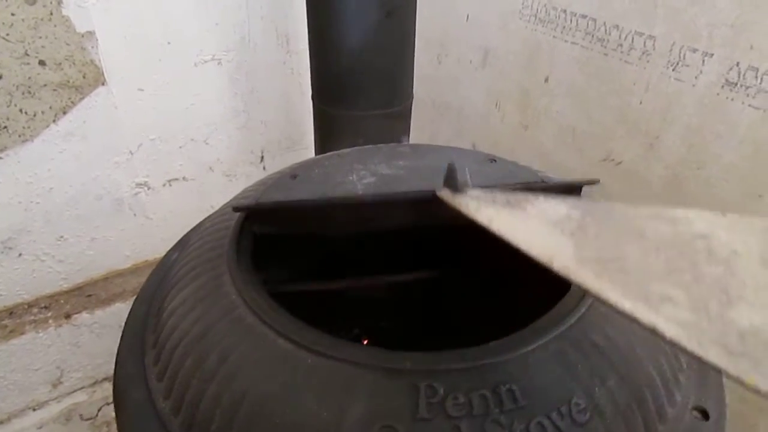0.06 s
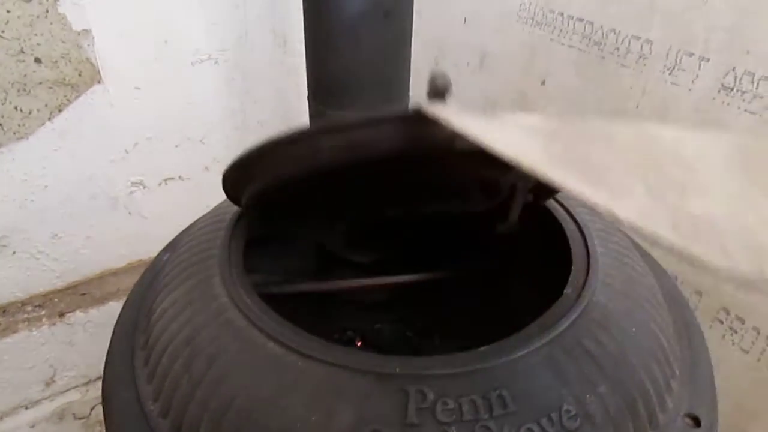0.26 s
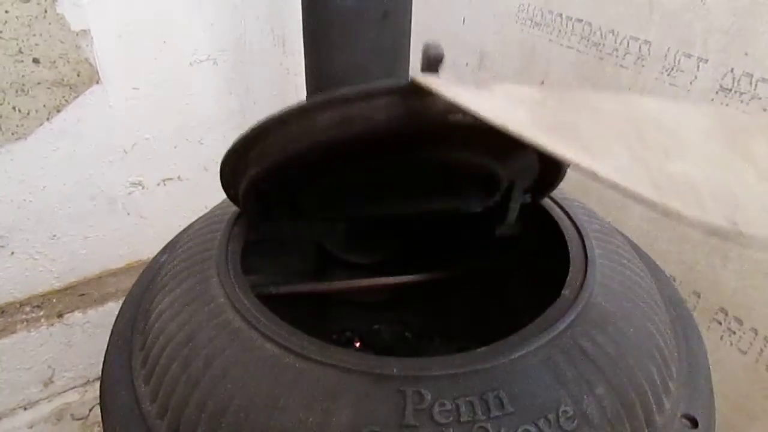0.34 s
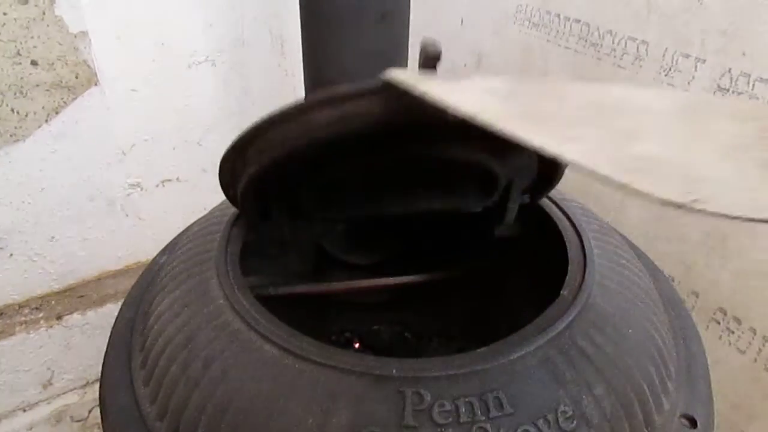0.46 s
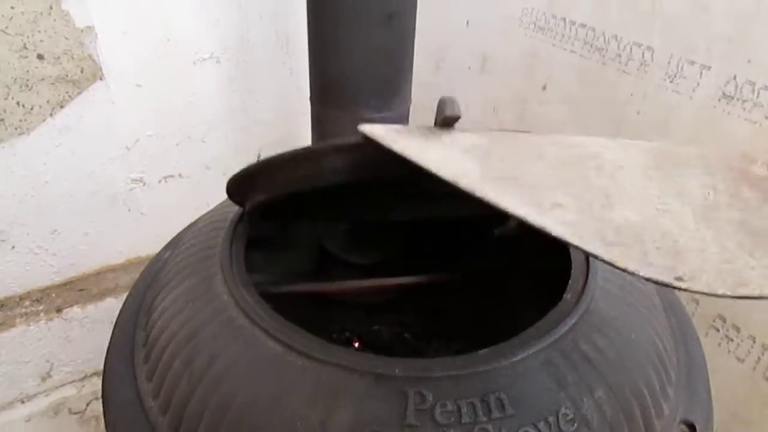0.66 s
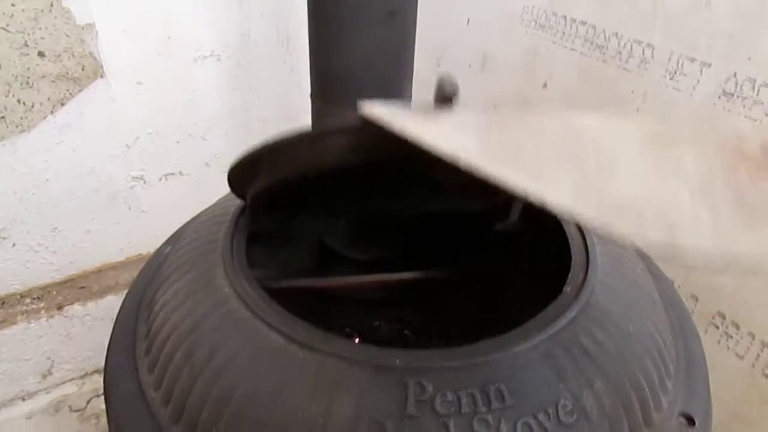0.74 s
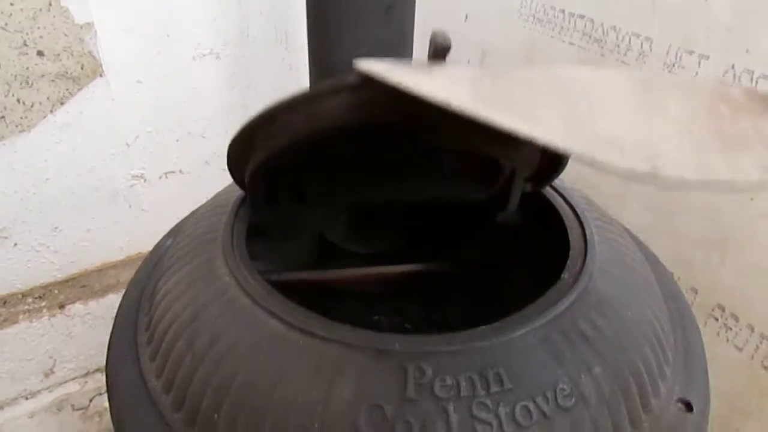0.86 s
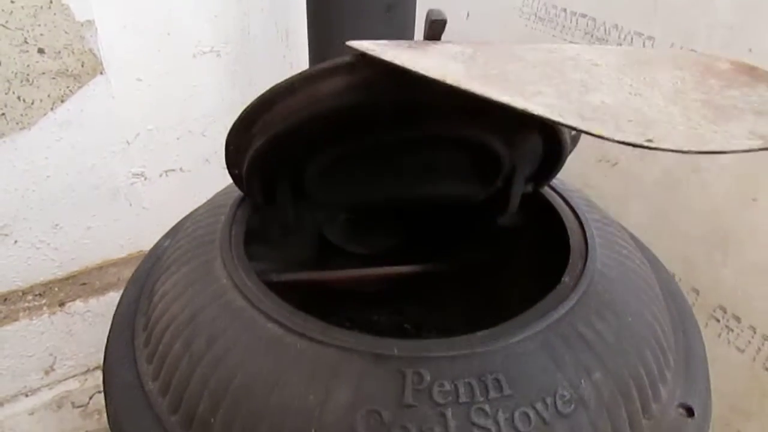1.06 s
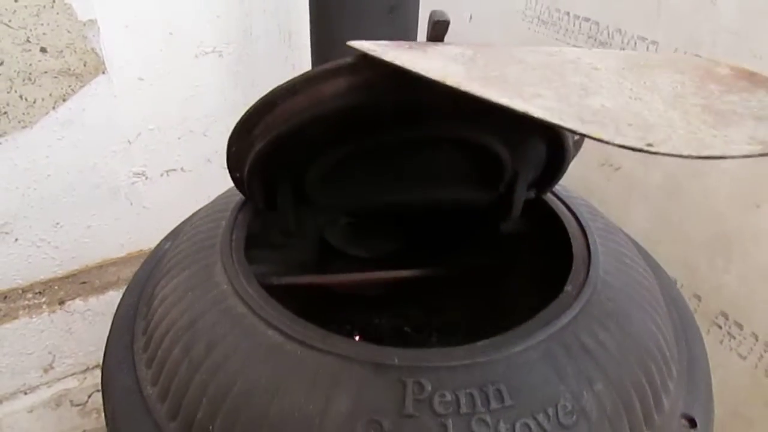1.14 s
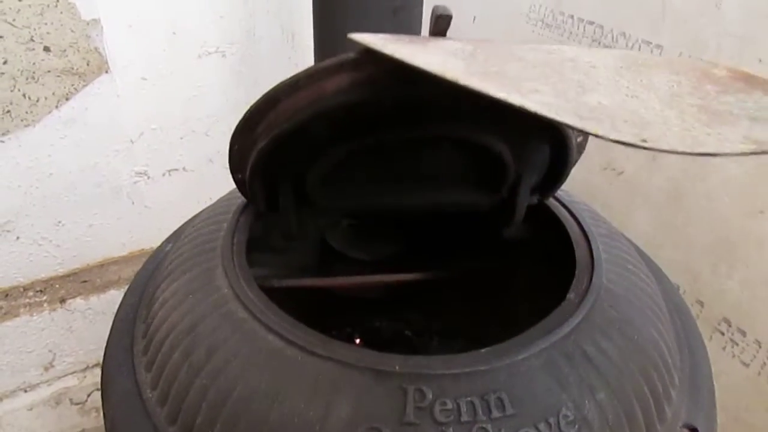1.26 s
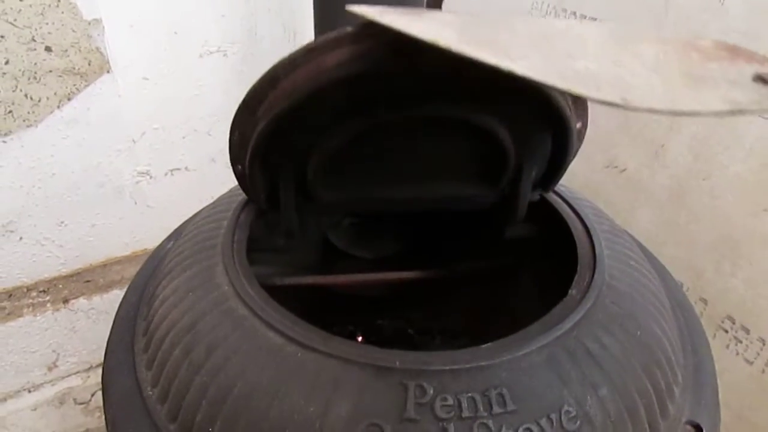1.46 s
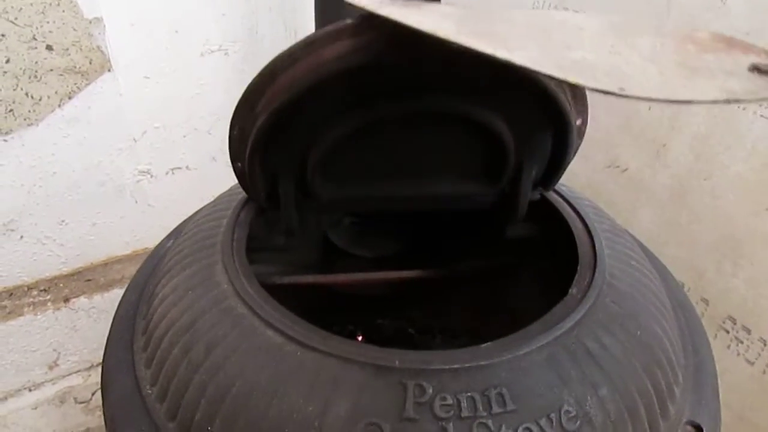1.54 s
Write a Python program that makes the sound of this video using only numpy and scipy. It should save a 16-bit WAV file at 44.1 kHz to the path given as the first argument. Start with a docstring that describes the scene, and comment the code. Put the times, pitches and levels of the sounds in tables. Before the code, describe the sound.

Close up in a quiet room, a metal blade strikes an iron stove lid, scrapes with a groaning ring and snaps free. A dull hinge thud, a faint tap and a soft bump follow over a faint hollow draught.

```python
"""Prying up a stove lid

In a small, quiet room a steel shovel blade clanks against the cast-iron lid of a stove, exciting its modes.
Stick-slip friction drives a ringing scrape, which ends with a bright snap as the edge comes free.
The lid thuds on its hinge, a little grit slides off, and a light knock and a soft bump follow.
Beneath it all, the draught sounds a low resonance in the hollow belly of the stove."""
import sys
import numpy as np
from scipy import signal
from scipy.fft import rfft, irfft
from scipy.io import wavfile
from scipy.ndimage import uniform_filter1d

SR = 44100
rng = np.random.default_rng(int(sys.argv[2]) if len(sys.argv) > 2 else 0)


def waveform_to_disk(signal):
    """Save audio, clipped to [-1, 1], as 16-bit WAV at the path in sys.argv[1]."""
    frames = np.transpose(np.atleast_2d(signal))
    scaled = np.clip(frames, -1, 1) * 32767
    samples = np.round(scaled).astype(np.int16)
    wavfile.write(sys.argv[1], SR, samples)


N = 70560
TIME_S = np.arange(N) / SR


def undb(db):
    """Amplitude ratio: a factor of ten per 20 dB."""
    return 10 ** (np.asarray(db) / 20)


def curve(rows):
    """Linear interpolation in time through (time_s, value) rows."""
    return np.interp(TIME_S, *np.array(rows).T)


def colour(x, points):
    """Minimum-phase filter through (frequency_hz, gain_db) points."""
    hz, db = np.array(points).T
    f = np.maximum(np.fft.rfftfreq(2 * N, 1 / SR), 1)
    cepstrum = irfft(np.log(undb(np.interp(np.log(f), np.log(hz), db))))
    cepstrum[1:N] *= 2  # folding the cepstrum makes the filter causal
    cepstrum[N + 1:] = 0
    return irfft(rfft(x, 2 * N) * np.exp(rfft(cepstrum)))[..., :N]


def noise(points):
    """Filtered Gaussian noise at unit RMS."""
    x = colour(rng.standard_normal(N), points)
    return x / x.std()


def metal(points, spacing_hz=75.16):
    """Dense modes of a plate: many unevenly spaced partials, together at unit RMS."""
    count = N // 100
    bins = (np.arange(count) + rng.random(count)) * spacing_hz * N / SR
    amplitudes = rng.standard_normal(count) + 1j * rng.standard_normal(count)
    in_band = bins < N // 2
    spectrum = np.zeros(N // 2 + 1, complex)
    spectrum[bins[in_band].astype(int)] = amplitudes[in_band]
    x = colour(irfft(spectrum, N), points)
    return x / x.std()


def fade(t60_s):
    """Exponential decay by 60 dB in t60_s."""
    return np.exp(-np.log(1000) * TIME_S / t60_s)


def mode(hz, t60_s):
    """Free vibration of a damped oscillator."""
    return np.sin(2 * np.pi * hz * TIME_S) * fade(t60_s)


def delay(x, seconds):
    """Time shift to the nearest sample."""
    return np.concatenate([np.zeros(round(seconds * SR)), x])[:N]


def drive(push, envelope, ring):
    """Forced vibration by convolution, scaled to the energy of the envelope."""
    response = signal.fftconvolve(push * envelope, ring)[:N]
    return response * np.linalg.norm(envelope) / np.linalg.norm(response)


def hits(rows, points, t60_s, body=noise):
    """Impact excitation: each (start_s, level_db) row sets off a dense, decaying ring."""
    return sum(delay(undb(db) * body(points) * fade(t60_s), s) for s, db in rows)


def air(level_db=-50, rumble_db=-53, left_lag_s=0.00013):
    """Partial coherence: the two sides share some room noise, over a rumble in antiphase."""
    # room noise: frequency_hz, gain_db
    spectrum = [(25, -24), (69, -5.5), (150, -5.5), (270, -5.5), (420, -11), (600, -12), (850, -10),
                (1200, -18.5), (2150, -19.5), (2700, -25), (3300, -34.5), (10500, -34.5), (15500, -45)]
    # filter for the part common to both sides: frequency_hz, gain_db
    common_filter = [(60, -35), (300, -2), (800, -14.5), (2300, -1), (5000, -12)]
    common = 0.43 * colour(noise(spectrum), common_filter)
    rumble_band = signal.butter(2, (40, 160), "band", fs=SR, output="sos")
    rumble = signal.sosfilt(rumble_band, rng.standard_normal(N))
    rumble = undb(rumble_db) * rumble / rumble.std()
    sides = np.array([delay(common, left_lag_s) + noise(spectrum), common + noise(spectrum)])
    return undb(level_db) * sides + np.array([rumble, -rumble])


def draught(pitch_hz=289.3):
    """Cavity resonance: moving air sounds the stove's belly, reaching each side by its own path."""
    # strength of the hollow note: time_s, level_db
    levels = [(0, -52.5), (.55, -51), (.68, -44.5), (.82, -50.5), (1.1, -50), (1.6, -55)]
    cavity = mode(pitch_hz, t60_s=0.061)
    return np.array([drive(rng.standard_normal(N), undb(curve(levels)), cavity) for _ in range(2)])


def grit():
    """Small impacts: grit sliding off the lid gives faint bursts of noise."""
    # grains: start_s, level_db
    grains = [(.157, -50.5), (.6905, -41.5), (.697, -42), (.709, -45), (.742, -48)]
    # sound of a grain: frequency_hz, gain_db
    spectrum = [(500, -6), (2000, 6.5), (4500, -2.5), (6500, -2.5), (15000, -21)]
    return hits(grains, spectrum, t60_s=0.086)


def clank(start_s=0.239, rise_s=0.0012, dense_db=-23, dense_t60_s=0.24):
    """Modal ringing: blade strikes lid, and clear modes beat over a dense ring whose treble dies first."""
    # modes of blade and lid: frequency_hz, level_db, t60_s
    modes = [(922, -26.5, 0.19), (1083, -19, 0.032), (1467, -26, 0.45), (2057, -22.5, 0.38),
             (2250, -38.5, 1), (2550, -28, 0.18), (2710, -35, 0.28), (3168, -33.5, 0.38), (3350, -31, 0.27),
             (3530, -34, 0.31), (3970, -33, 0.14), (4270, -34.5, 0.37), (4400, -36, 0.2),
             (5090, -32.5, 0.29), (5370, -26.5, 0.16), (5670, -47, 0.11), (6000, -50, 0.095),
             (6320, -25.5, 0.18)]
    # dense ring: frequency_hz, gain_db
    spectrum = [(30, -22), (75, 11), (170, -23), (300, -4), (700, -8), (1100, -2.5), (2300, 5.5),
                (4200, -4), (4700, -7.5), (8500, -2.5), (11500, -7.5), (15500, -33)]
    # single rebound of the blade: start_s, level_db
    bounce = [(.245, -23.5)]
    partials = metal(spectrum)
    dense, below, clear = 0, 0, 0
    for edge_hz in 500 * 2. ** np.arange(6):  # octave bands, damped faster above 2 kHz
        low = signal.sosfiltfilt(signal.butter(4, edge_hz, fs=SR, output="sos"), partials)
        dense += (low - below) * fade(dense_t60_s * min(1, (2000 / edge_hz) ** 0.5))
        below = low
    for hz, db, t60_s in modes:
        beat_hz = 0.01465 * hz * rng.uniform(1, 1.97)
        twin = 0.29 * mode(hz + beat_hz, t60_s / 2)
        clear += rng.choice([-1, 1]) * undb(db) * (mode(hz, t60_s) + twin)
    seating = 1 - np.exp(-TIME_S / rise_s)  # the blade seats itself against the lid
    strike = (clear + undb(dense_db) * dense) * seating
    return delay(strike, start_s) + hits(bounce, spectrum, t60_s=0.029)


def sing(envelope, hz, t60_s, drift_hz=14):
    """Self-sustained oscillation: friction holds a wavering mode, which rings on when the push stops."""
    energy_decay = fade(t60_s) ** 2
    power = np.abs(signal.fftconvolve(envelope ** 2, energy_decay / energy_decay.sum())[:N])
    drift = uniform_filter1d(rng.standard_normal(N), size=1024)
    cycles = rng.random() + np.cumsum(hz + drift_hz * drift / drift.std()) / SR
    return np.sqrt(2 * power) * np.sin(2 * np.pi * cycles)


def friction(slips_per_s=460, scatter_db=1.5, low_cut_hz=650):
    """Stick-slip excitation: randomly timed impulses over continuous rubbing noise."""
    slips = (rng.random(N) < slips_per_s / SR) * undb(scatter_db * np.clip(rng.standard_normal(N), -2, 2))
    push = (slips - slips.mean()) / slips.std() + 0.38 * rng.standard_normal(N)
    return signal.sosfilt(signal.butter(1, low_cut_hz, "high", fs=SR, output="sos"), push)


def scrape(shift_s=0.504, shift_length_s=0.049, sung_share=0.55):
    """Friction-driven vibration: modes sing and rattle, trading strength as the contact point travels."""
    # modes rung by the stroke: frequency_hz, early_db, late_db, t60_s
    modes = [(817.5, -32.5, -51, 0.11), (940, -36, -54, 0.039), (1076, -41, -33, 0.052),
             (1218, -37.5, -50, 0.17), (1443, -34.5, -32.5, 0.19), (1526, -29, -33, 0.086),
             (1555, -29.5, -28.5, 0.33), (1745, -49, -27.5, 0.28), (1830, -41, -41, 0.23),
             (2100, -33, -34, 0.13), (2128, -29, -30.5, 0.22), (2208, -33.5, -23.5, 0.16),
             (2404, -44.5, -23.5, 0.17), (2712, -39, -35.5, 0.16), (3150, -54, -50, 0.17),
             (3356, -53, -34, 0.27), (5130, -54, -47, 0.11), (5400, -75, -41.5, 0.17),
             (6420, -52, -55, 0.15), (8440, -50.5, -40, 0.17)]
    # force of the blade on the lid: time_s, level_db
    stroke = [(.328, -19), (.36, -14), (.378, -3.5), (.396, -7.5), (.417, -10.5), (.423, 2), (.44, 2),
              (.482, -2.5), (.499, 4), (.508, 2), (.535, -1), (.548, -13.5), (.58, -32)]
    # coarse rasp: frequency_hz, gain_db
    rasp_spectrum = [(40, -38), (130, -16), (300, -5), (560, -13.5), (720, 11), (900, -4.5), (2300, -5),
                     (3300, 3.5), (4300, -13.5), (15000, -46)]
    # fine hiss of the rough iron: frequency_hz, gain_db
    hiss_spectrum = [(2500, -8.5), (4200, 9.5), (4700, -9), (5200, 3), (5900, -3), (7200, 4.5),
                     (8400, -6.5), (8900, -19), (9400, 4.5), (12200, -4.5), (13000, -6), (13900, -8),
                     (15000, -14)]
    rasp_db, hiss_db, hiss_rise_db_per_s = -31, -35, 34
    start_s, end_s = stroke[0][0], stroke[-1][0]
    push = friction()
    force = undb(curve(stroke)) * (TIME_S > start_s) * (TIME_S < end_s)
    late = np.clip(0.5 + (TIME_S - shift_s) / shift_length_s, 0, 1)
    ring = 0
    for hz, early_db, late_db, t60_s in modes:
        envelope = force * ((1 - late) * undb(early_db) + late * undb(late_db))
        ring += np.sqrt(sung_share) * sing(envelope, hz, t60_s)
        ring += np.sqrt(1 - sung_share) * drive(push, envelope, mode(hz, t60_s))
    rasp = drive(push, force * undb(rasp_db), noise(rasp_spectrum) * fade(t60_s=0.3))
    sharpening = undb(hiss_rise_db_per_s * (np.minimum(TIME_S, end_s) - shift_s))
    hiss = drive(push, force * sharpening * undb(hiss_db), metal(hiss_spectrum) * fade(t60_s=0.15))
    return ring + rasp + hiss + catches(modes)


def groan(roughness=0.15, waver_cutoff_hz=79):
    """Friction sustains one low mode of the lid; it swells and sags with each bite of the edge."""
    # course of the groan: time_s, pitch_hz, level_db
    course = [(.33, 706, -65), (.348, 710.8, -40), (0.387, 699.7, -31.5), (0.412, 701.2, -39),
              (0.434, 726.3, -22.5), (.452, 712, -30), (0.468, 693.2, -18.5), (0.489, 685, -47),
              (0.512, 708.7, -21.5), (0.543, 681, -32.5), (0.588, 656, -43.5), (.61, 656, -74)]
    times, hz, db = np.array(course).T
    envelope = undb(np.interp(TIME_S, times, db)) * (TIME_S > times[0]) * (TIME_S < times[-1])
    smoothing = signal.butter(2, waver_cutoff_hz, fs=SR, output="sos")
    waver = signal.sosfilt(smoothing, rng.standard_normal((2, N)))
    flutter, jitter = roughness * waver / waver.std()
    phase = 2 * np.pi * np.cumsum(np.interp(TIME_S, times, hz)) / SR
    return envelope * (1 + flutter) * np.sin(phase + jitter)


def catches(modes):
    """Impulsive excitation: each bite of the edge crashes and rings the modes of the early contact."""
    # bites: start_s, level_db
    bites = [(0.422, -18.5), (0.4247, -16.5), (0.4366, -22), (.4425, -20), (.4505, -17), (.509, -23),
             (.535, -26.5)]
    # crash of a bite: frequency_hz, gain_db
    spectrum = [(40, -42), (130, -14), (500, -15), (1000, 7), (2200, 10), (3500, -7), (15500, -20.5)]
    ring = sum(rng.choice([-1, 1]) * undb(db) * mode(hz, t60_s) for hz, db, _, t60_s in modes)
    ring = 1.191 * ring / abs(ring).max()
    return hits(bites, spectrum, t60_s=0.039) + sum(delay(undb(db) * ring, s) for s, db in bites)


def squeak(peak_s=0.5335, half_width_s=0.0051, pitch_hz=8390, level_db=-25.5):
    """Friction squeal: a Gaussian tone burst just before the edge slips free."""
    envelope = undb(level_db) * np.exp(-((TIME_S - peak_s) / half_width_s) ** 2)
    return envelope * np.sin(2 * np.pi * pitch_hz * TIME_S)


def snap():
    """Sudden release: the edge comes free and the high partials of the metal ring briefly."""
    # release of the edge: start_s, level_db
    release = [(.549, -22.5)]
    # bright ring: frequency_hz, gain_db
    spectrum = [(500, -47), (5800, 5), (8000, -11), (11000, 4), (15500, -3)]
    return hits(release, spectrum, t60_s=0.077, body=metal)


def thuds(pitch_hz=375, ring_gain_db=-3.5):
    """Impact and resonance: the lid drops against its hinge and rings the hollow stove."""
    # blows on the hinge: start_s, level_db
    blows = [(.6085, -36.5), (0.6193, -31.5), (.641, -39)]
    # dull thud: frequency_hz, gain_db
    spectrum = [(60, -29), (370, 4.5), (560, 6), (900, 5.5), (1500, -23), (8000, -68)]
    ring = undb(ring_gain_db) * mode(pitch_hz, t60_s=0.037)
    return hits(blows, spectrum, t60_s=0.1) + sum(delay(undb(db) * ring, s) for s, db in blows)


def knock():
    """Free decay: the blade taps the lid, and two lightly damped modes outlast the dense ring."""
    # tap of the blade: start_s, level_db
    tap = [(1.171, -39)]
    # dense ring: frequency_hz, gain_db
    spectrum = [(200, -27), (700, 5), (1400, 4), (2200, 9.5), (3200, -6.5), (5000, -24)]
    # lingering modes: frequency_hz, level_db, t60_s
    modes = [(1240, -50, 0.39), (2135, -51.5, 0.87)]
    ring = sum(undb(db) * mode(hz, t60_s) for hz, db, t60_s in modes)
    return hits(tap, spectrum, t60_s=0.19, body=metal) + delay(ring, tap[0][0])


def bump(start_s=1.5398, pitch_hz=333, level_db=-32):
    """Heavy damping: the lid, lifted higher, gives a soft bump of only a few cycles."""
    softening = signal.butter(2, 2 * pitch_hz, fs=SR, output="sos")
    pulse = signal.sosfilt(softening, np.gradient(mode(pitch_hz, t60_s=0.0073)))
    return delay(-undb(level_db) * pulse / abs(pulse).max(), start_s)


def room(direct, echo_db=-20.5, t60_s=0.76):
    """Reverberation: diffuse reflections from the walls follow the direct sound."""
    # wall echo: frequency_hz, gain_db
    spectrum = [(100, 19), (800, 6.5), (3000, -3.5), (15000, -5)]
    walls = delay(noise(spectrum) * fade(t60_s), seconds=0.005)
    return direct + undb(echo_db) * signal.fftconvolve(direct, walls / np.linalg.norm(walls))[:N]


def far_side(x):
    """Level and phase differences: the lid sounds later and duller on the left."""
    # level of left against right: frequency_hz, gain_db
    gains = [(100, 0.5), (380, 6), (700, 0), (2400, -7), (4200, -9), (5200, -17), (15000, -25)]
    # phase of left against right: frequency_hz, phase_rad
    phases = [(20, 1.5), (300, -1.38), (650, -1.35), (1750, -1.63), (2200, -2), (4000, -2.5),
              (16000, -17.5)]
    f = np.maximum(np.fft.rfftfreq(2 * N, 1 / SR), 1)
    hz, db = np.array(gains).T
    gain = undb(np.interp(np.log(f), np.log(hz), db))
    phase = np.interp(f, *np.array(phases).T)
    return irfft(rfft(x, 2 * N) * gain * np.exp(1j * phase))[:N]


def scene():
    """Superposition: the lid, close by and to the right, sounds over room noise and draught."""
    direct = grit() + clank() + scrape() + groan() + squeak() + snap() + thuds() + knock() + bump()
    left, right = far_side(room(direct)), room(direct)
    background = (air() + draught()) * undb([[0.25], [-0.25]])  # slightly stronger on the left
    return np.array([left, right]) + background


def record(dry):
    """Band limiting: a steep elliptic low-pass removes the treble above 15.75 kHz."""
    return signal.sosfilt(signal.ellip(10, .2, 80, 15750, fs=SR, output="sos"), dry)


dry = scene()
out = record(dry)
waveform_to_disk(out)
```